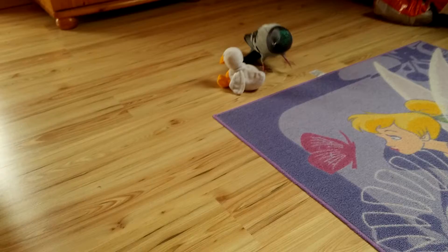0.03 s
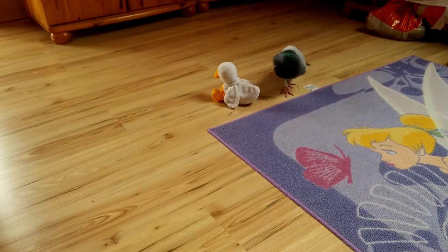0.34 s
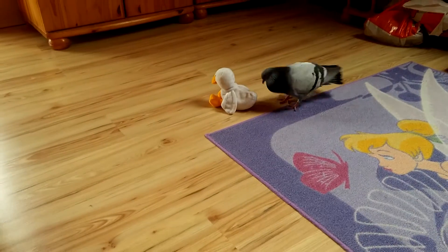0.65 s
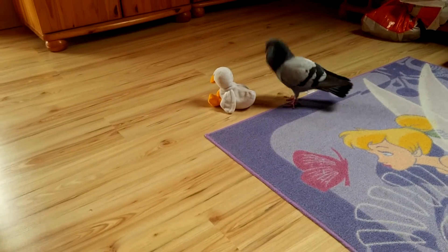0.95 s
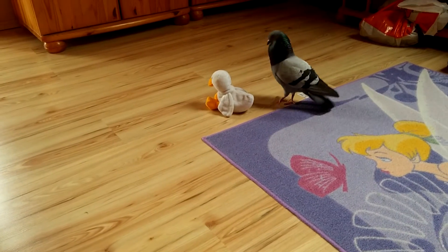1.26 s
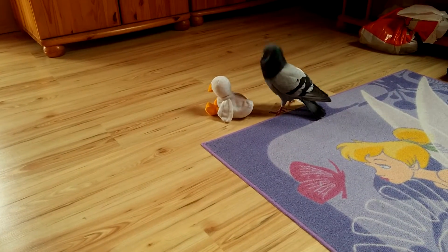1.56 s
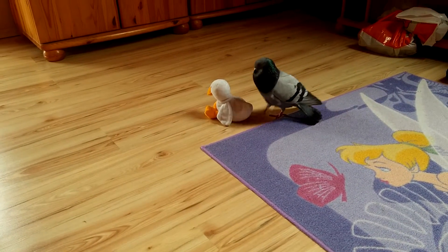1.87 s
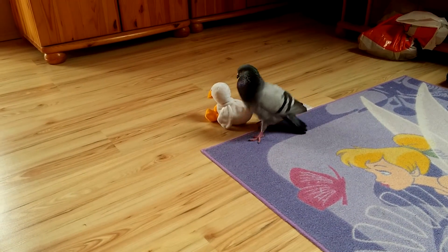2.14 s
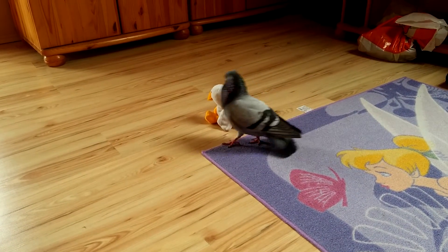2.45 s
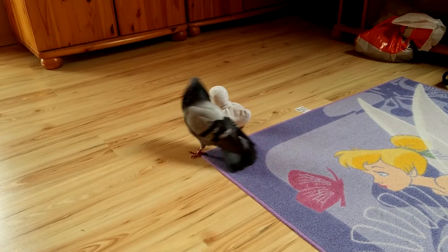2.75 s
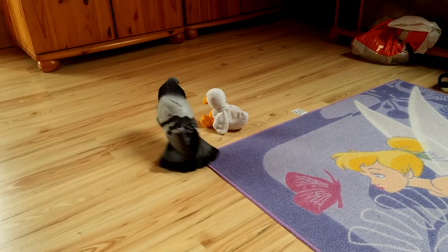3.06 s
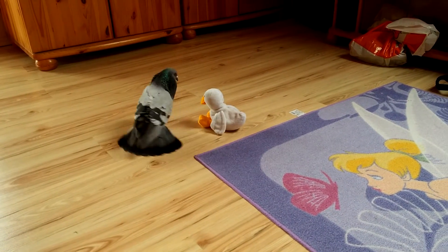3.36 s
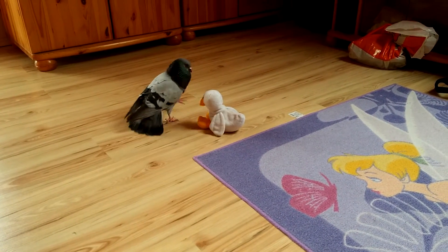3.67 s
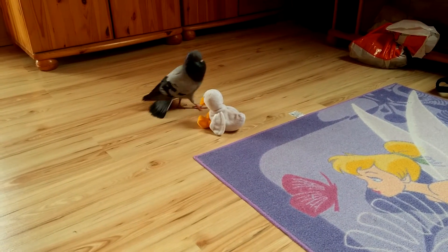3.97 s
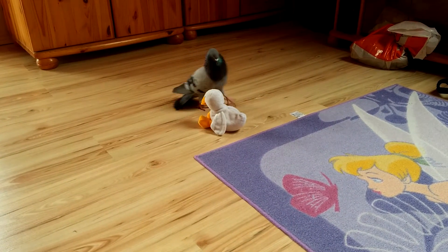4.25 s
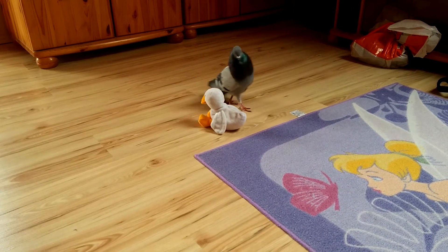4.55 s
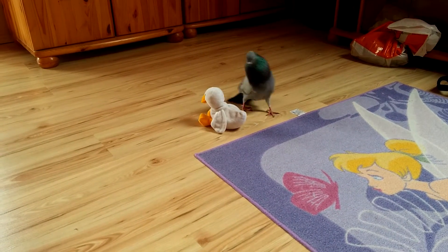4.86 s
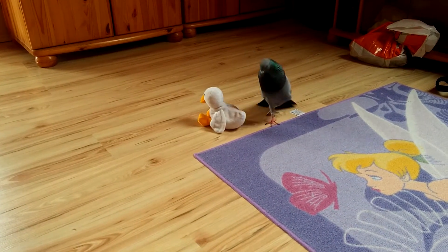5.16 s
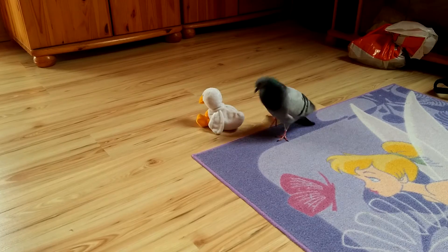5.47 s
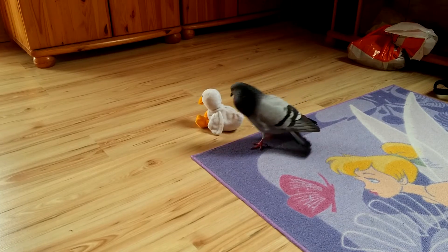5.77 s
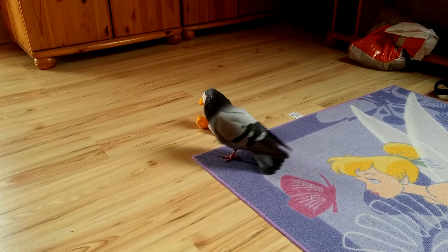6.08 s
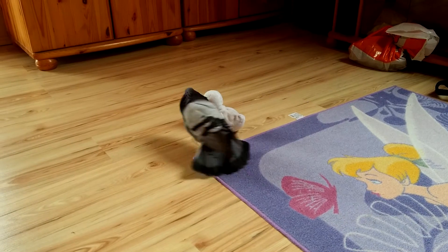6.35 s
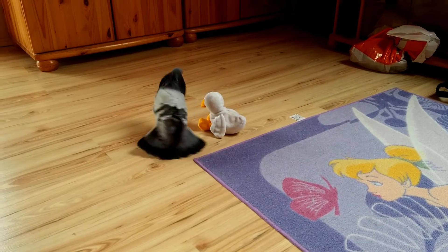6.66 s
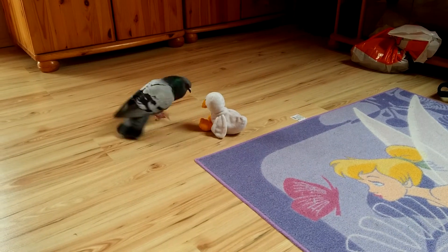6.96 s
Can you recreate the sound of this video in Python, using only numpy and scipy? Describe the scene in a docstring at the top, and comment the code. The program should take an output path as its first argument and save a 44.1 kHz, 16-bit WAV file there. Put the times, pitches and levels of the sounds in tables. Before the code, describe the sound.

A pigeon gives a short, throaty rolling coo, then walks on a wooden floor with light claw ticks and scuffs.

```python
"""A pigeon struts and coos

A pigeon walks round a soft toy on a wooden floor in a small, quiet room. It gives a throaty
coo: a nearly pure tone, chopped by a flutter so that it rolls. Its claws tick, scuff and knock
the boards, and its fanned tail hisses over rug and floor. Then it starts to coo again."""
import sys
import numpy as np
from scipy import signal
from scipy.fft import rfft, irfft
from scipy.io import wavfile
from scipy.ndimage import uniform_filter1d

SR = 44100
rng = np.random.default_rng(int(sys.argv[2]) if len(sys.argv) > 2 else 0)


def pcm_store(signal):
    """Save signal as 16-bit PCM."""
    levels = np.round(np.clip(np.atleast_2d(signal), -1, 1) * 32767)
    wavfile.write(sys.argv[1], SR, levels.astype(np.int16).T)


N = 318402
T = np.arange(N) / SR

# tone of the room air, the feathers, a claw's tick, a claw's scrape and the throat:
# (frequency [Hz], gain [dB])
AIR_TONE = [(25, -39), (55, -19), (246, -7.5), (400, -8.5), (1050, -11.5), (2230, -13.5), (4750, -16),
            (7300, -22.5), (11000, -39), (15500, -27.5)]
FEATHER_TONE = [(300, -1.5), (900, -3.5), (1800, -2), (2500, -3), (4000, -1), (5800, -3), (7600, -10.5),
                (10300, -3.5), (13000, -8), (15500, -11.5)]
TICK_TONE = [(800, -31), (1800, -28), (2400, -10.5), (3300, 1.5), (4400, 1), (5800, 1.5), (7600, -6),
             (10200, -2), (12500, -8.5), (15500, -9.5)]
SCRAPE_TONE = [(800, -24), (1800, -9.5), (2400, -12), (3300, 0), (4400, -1), (5800, -1.5), (7600, -10.5),
               (10200, -7), (12500, -12), (15500, -22)]
THROAT_TONE = [(130, -37), (180, -14), (225, -1), (450, 2), (610, -5), (700, -13.5), (860, -5.5),
               (1150, -6), (1500, -37)]
# curve that, scaled for each side, puts the bird to the right: (frequency [Hz], gain [dB])
SIDE_TILT = [(250, -0.5), (500, -2.5), (2000, -3.5), (4000, -3), (8000, -7), (10500, -7), (13000, 0)]
# the fanned tail brushing the ground: (time [s], level [dB])
TAIL_BRUSH = [(.6, -73.5), (1.3, -76.5), (1.66, -70.5), (1.85, -82), (2.0, -69.5), (2.5, -70.5),
              (2.95, -63), (3.2, -65.5), (3.76, -72.5), (4.3, -79), (4.9, -76), (5.5, -68), (5.66, -68.5),
              (5.9, -65), (6.66, -63.5), (6.86, -78)]
# small dry clicks during the coo: (time [s], level [dB], pitch [Hz])
DRY_CLICKS = [(0.738, -55.5, 877), (.773, -55.5, 700), (0.8689, -45.5, 845)]
# the ways a floorboard rings: (frequency [Hz], width [Hz], gain [dB])
BOARD_RINGS = [(282, 77, -5.5), (473, 94, 3), (595, 78, 5), (826, 170, -11), (1160, 800, -23.5)]
# feet landing: (time [s], tick level [dB], knock level [dB], wait for the next toe [s])
FOOTFALLS = [(.979, -52.5, -62, 0.0074), (1.387, -60.5, -84, 0.027), (2.019, -55.5, -75, 0.0242),
             (2.528, -58, -65.5, 0.03), (2.7995, -50.5, -63.5, .008), (3.047, -51, -63, 0.0266),
             (3.342, -48.5, -66, 0.00965), (3.556, -50.5, -66.5, 0.021), (3.830, -46, -62, .009),
             (4.059, -50.5, -67, 0.018), (4.371, -49.5, -65.5, 0.00867), (4.619, -55, -67.5, 0.014),
             (4.9507, -51.5, -64, 0.022), (5.255, -57, -70.5, .012), (5.278, -68, -61.5, .012),
             (6.275, -54.5, -69.5, .012), (6.5217, -51, -66, .008), (6.6741, -56, -64.5, .03),
             (6.755, -52, -58.5, 0.00754), (6.9515, -47, -60.5, 0.00998), (7.1257, -45.5, -57, 0.013)]
# claws sliding as a foot pushes off: (time [s], level [dB])
CLAW_SLIDES = [(1.72, -61.5), (2.06, -59), (3.102, -50.5), (3.614, -49.5), (3.893, -52.5), (4.133, -50.5),
               (4.449, -49.5), (4.716, -60.5), (5.034, -48.5), (5.306, -53.5), (6.705, -50.5),
               (6.732, -54.5), (7.02, -54)]
# stutters that open the coo, each a throat pop and then a hum: (time [s], level [dB])
COO_STUTTERS = [(.604, -46.5), (.669, -37), (.811, -36)]
# a thin, clear tone between the opening notes: (time [s], pitch [Hz])
THIN_TONE = [(.604, 585), (.645, 632), (.70, 562), (.78, 586), (.915, 586)]
# short notes of the coo: (time [s], length [s], pitch [Hz], level [dB], roughness [0 = smooth])
COO_NOTES = [(.722, 0.053, 320, -59, .4), (.866, .019, 320, -54.5, 0.12), (.890, 0.015, 446.8, -37.5, 0.24),
             (0.929, 0.015, 372, -32, 0.18), (.951, 0.017, 409, -34.5, 0.25),
             (0.974, 0.0081, 363, -33, 0.25), (.992, 0.028, 314.4, -33, 0.31),
             (1.065, 0.0084, 286, -29.5, 0.4), (1.288, .02, 221, -36, 0.3),
             (6.763, 0.088, 239, -58.5, 1.23), (6.805, .13, 446, -56.5, 0.6),
             (6.89, .13, 169.4, -43.5, 0.06), (6.924, .1, 444, -63, 0.6), (7.003, .032, 225, -51, 0.28),
             (7.063, 0.025, 224, -41, 0.1), (7.088, .045, 221.6, -50.5, .4), (7.109, 0.025, 602, -40, 0.43),
             (7.175, 0.03, 232, -49, 0.1), (7.205, 0.015, 219, -36.5, 0.2)]
# the long rolling note: (time [s], pitch [Hz], level [dB], roughness [0 = smooth])
COO_ROLL = [(1.018, 300, -37.5, 0.74), (1.048, 288.7, -38, 0.94), (1.059, 291, -50, 1.1),
            (1.078, 291, -36.5, 1.06), (1.16, 297.5, -41, 0.66), (1.25, 270.9, -38, .5),
            (1.30, 236.5, -43.5, 0.63), (1.33, 244.6, -54, 0.77), (1.39, 258.5, -67.5, 0.8)]


def undb(db):
    """Turn decibels into a number to multiply by."""
    return 10 ** (np.asarray(db) / 20)


def unit(x):
    """Scale a signal to an average power of 1."""
    return x / np.sqrt(np.mean(x ** 2))


def curves(table):
    """A table's columns, joined by straight lines in time."""
    times, *columns = np.transpose(table)
    return [np.interp(T, times, column) for column in columns]


def during(table, fade_s=0.0031):
    """Fade in at a table's first time and out at its last."""
    return np.clip(np.minimum(T - table[0][0], table[-1][0] - T) / fade_s, 0, 1)


def colour(x, tone, amount=1):
    """Filter a sound by a tone table; amount scales its decibels."""
    hz, db = np.transpose(tone)
    f = np.maximum(np.fft.rfftfreq(x.shape[-1], 1 / SR), 1)
    return irfft(rfft(x) * undb(amount * np.interp(np.log(f), np.log(hz), db)), x.shape[-1])


def ring(x, hz, width_hz):
    """Keep the part of a sound near one frequency."""
    return signal.lfilter(*signal.iirpeak(hz, hz / width_hz, fs=SR), x)


def wobble(per_second):
    """A smooth random drift, about 1 in size."""
    hold = max(int(SR / per_second), 1)
    steps = np.repeat(rng.standard_normal(N // hold + 1), hold)
    return unit(uniform_filter1d(steps, hold)[:N])


def diffuse(size, alike_hz=900):
    """Noise from all sides: left and right agree only in the bass."""
    mid, side = rng.standard_normal((2, size))
    f = np.fft.rfftfreq(size, 1 / SR)
    alike = .97 / (1 + (f / alike_hz) ** 4)
    mid = irfft(rfft(mid) * np.sqrt(1 + alike), size)
    side = irfft(rfft(side) * np.sqrt(1 - alike), size)
    return np.array([mid + side, mid - side]) / np.sqrt(2)


def add(track, start_s, sound):
    """Mix a sound into a track."""
    i = int(start_s * SR)
    track[..., i:i + sound.shape[-1]] += sound[..., :max(N - i, 0)]


def room(x, left_db, echo_db, reverb_db, reverb_s, echo_s=.0072, left_lag_s=0.00019):
    """The direct sound, one near echo and a short wash of echoes, different each time."""
    t = T[:SR // 3]
    build_up = np.clip((t - .002) / 0.0066, 0, 1)
    response = diffuse(len(t)) * build_up * np.exp(-np.log(1000) * t / reverb_s)
    response *= undb(reverb_db) / np.sqrt(np.sum(response ** 2) / 2)
    # the bird is to the right, so its sound reaches the left later
    response[0, int(left_lag_s * SR)] += undb(left_db)
    response[1, 0] += 1
    for side, lag in zip(response, echo_s * rng.uniform(.9, 1.1, 2)):
        side[int(lag * SR)] += undb(echo_db)
    return signal.fftconvolve(x[None], response, axes=1)[:, :N]


def background():
    """Still air and soft hiss, with a faint rumble that differs left and right."""
    air = unit(colour(diffuse(N, alike_hz=516), AIR_TONE))
    rumble = unit(ring(rng.standard_normal((2, N)), hz=89.7, width_hz=63))
    return undb(-66.5) * air + undb(-76) * rumble


def tail(flicker_db=0.68):
    """Feather tips brush the ground with a soft, slightly uneven hiss."""
    db, = curves(TAIL_BRUSH)
    hiss = unit(colour(diffuse(N), FEATHER_TONE))
    return hiss * undb(db + 1 + flicker_db * wobble(35))


def clicks(ring_s=0.00097):
    """Tiny dull pops, each a wave or two long."""
    pops, t = np.zeros(N), T[:SR // 50]
    for start, db, hz in DRY_CLICKS:
        phase = 2 * np.pi * hz * t
        tone = np.sin(phase) + 0.3 * np.sin(1.534 * phase)
        add(pops, start, undb(db) * np.exp(-t / ring_s) * tone)
    midrange = signal.butter(4, [550, 2600], "bandpass", fs=SR, output="sos")
    return undb(13.5) * signal.sosfilt(midrange, pops)


def friction(size, uneven_db):
    """Rubbing: a dense run of tiny catches, some weak and some strong."""
    return unit(rng.standard_normal(size) * undb(uneven_db * rng.exponential(size=size)))


def bending_tick(size, spread_s=.0024):
    """A click that has run along a bending board, where highs travel faster than lows."""
    f = np.fft.rfftfreq(size, 1 / SR)
    spread = spread_s * rng.uniform(.6, 1.1)
    # the delay falls as 1 / sqrt(f) and is zero at the highest frequency
    chirp = irfft(np.exp(-1j * np.pi * spread * (2 * np.sqrt(f * SR / 2) - f)), size)
    return chirp * np.linspace(1, 0, size) ** 2


def claw_tap(t, chatter_s=0.0094):
    """A claw lands on varnish with a tick, a short ping and a brief chatter."""
    tick = undb(10) * bending_tick(len(t))
    ping = undb(-6) * ring(tick, hz=4940, width_hz=830)
    chatter = undb(-16.5) * friction(len(t), uneven_db=3) * np.exp(-t / chatter_s)
    return tick + ping + chatter


def floorboards(knocks):
    """Each push of a foot shakes the boards and makes them ring."""
    shaking = np.zeros((2, N))
    for start, push in knocks:
        thud = push * rng.standard_normal(len(push))
        add(shaking, start, room(thud, left_db=3, echo_db=-9, reverb_db=5, reverb_s=0.34))
    return sum(undb(db) * ring(shaking, hz, width) for hz, width, db in BOARD_RINGS)


def feet(next_tick_db=-6.5, knock_s=0.016, slide_s=0.028):
    """Toe after toe taps down, and sliding claws scrape. Both knock the boards."""
    ticks, scrapes = np.zeros((2, 2, N))
    t = T[:SR // 10]
    knocks = []
    for first, tick_db, knock_db, wait in FOOTFALLS:
        for start, toe_db in (first, 0), (first + wait, next_tick_db):
            tap = undb(tick_db + toe_db) * claw_tap(t)
            add(ticks, start, room(tap, left_db=-4.5, echo_db=-6.5, reverb_db=6.5, reverb_s=0.2573))
            # the two toes share the bird's weight
            knocks.append((start, undb(knock_db) * np.exp(-t / knock_s) / np.sqrt(2)))
    press = np.sin(np.linspace(0, np.pi, int(slide_s * SR)))
    for start, db in CLAW_SLIDES:
        scrape = undb(db) * press * friction(len(press), uneven_db=4)
        add(scrapes, start, room(scrape, left_db=-1, echo_db=-7, reverb_db=5.5, reverb_s=0.24))
        knocks.append((start, undb(db - 16.5) * press / 2))
    claws = undb(12) * colour(ticks, TICK_TONE) + undb(1.5) * colour(scrapes, SCRAPE_TONE)
    return claws + undb(15.5) * floorboards(knocks)


def voice_box(hz, octave_db, rough, flutter, pull=0.63):
    """A nearly pure tone that the flutter chops and bends; roughness weakens its top overtones."""
    phase = 2 * np.pi * np.cumsum(hz) / SR
    shaken = phase + pull * rough * flutter
    tone = np.sin(shaken) + undb(octave_db) * np.sin(phase + shaken)
    chopped = tone * (1 + rough * flutter) / np.sqrt(1 + rough ** 2)
    overtones = undb(octave_db - 7) * (1 - rough) * (np.sin(3 * phase) + np.sin(4 * phase) / 2)
    return np.sqrt(2) * (chopped + overtones)


def note(length, hz, db, rough, flutter, rise_share=0.19, sag_share=.03, crop_hz=456, crop_width_hz=52):
    """One short note: it starts fast, sags in pitch and fades over its second half."""
    age = np.linspace(0, 1, int(length * SR))
    opening = np.clip(np.minimum(age / rise_share, 2 * (1 - age)), 0, 1)
    # the swollen crop, a pouch in the neck, boosts the octave above low notes
    octave_db = -20 + 14 * np.exp(-((2 * hz - crop_hz) / crop_width_hz) ** 2)
    tone = voice_box(hz * (1 - sag_share * age), octave_db, rough, flutter[:len(age)])
    return undb(db) * np.sin(np.pi / 2 * opening) * tone


def stutters(pop_s=0.009, pop_hz=330, hum_after_s=0.01117, hum_s=0.033, hum_hz=317.7, rough=0.39):
    """List the opening notes: each stutter is a pop of the throat, then a softer hum."""
    pops = [(start, pop_s, pop_hz, db + 3, rough) for start, db in COO_STUTTERS]
    hums = [(start + hum_after_s, hum_s, hum_hz, db, rough) for start, db in COO_STUTTERS]
    return pops + hums


def coo(flutter_hz=98):
    """Stuttering notes run into a long falling roll, made throaty by uneven flutter and pitch."""
    beat = 2 * np.pi * np.cumsum(flutter_hz * (1 + .27 * wobble(110))) / SR
    slower_beat = .8 * np.cos(.6 * beat) * wobble(60)
    flutter = unit(np.tanh(np.cos(beat) + slower_beat + .4 * wobble(250)))
    roll_hz, roll_db, roll_rough = curves(COO_ROLL)
    roll_hz *= 1 + .065 * roll_rough ** 2 * wobble(140)
    roll = voice_box(roll_hz, octave_db=-6.5, rough=roll_rough, flutter=flutter)
    thin_hz, = curves(THIN_TONE)
    thin = voice_box(thin_hz, octave_db=-17, rough=0.13, flutter=flutter)
    voice = undb(roll_db) * roll * during(COO_ROLL) + undb(-53) * thin * during(THIN_TONE)
    for start, length, hz, db, rough in stutters() + COO_NOTES:
        add(voice, start, note(length, hz, db, rough, np.roll(flutter, -int(start * SR))))
    voice = undb(-1.65) * colour(voice, THROAT_TONE)
    return room(voice, left_db=0.5, echo_db=-15.5, reverb_db=-5.5, reverb_s=0.27)


def scene():
    """The bird, a little to the right, in the quiet room."""
    left, right = feet() + coo() + clicks() + tail()
    bird = np.array([colour(left, SIDE_TILT, amount=0.27), colour(right, SIDE_TILT, amount=-0.84)])
    return bird + background()


def record(dry):
    """The sound starts after a moment of silence; the highest treble is cut steeply."""
    start_s, fade_s, top_hz = .603, .002, 15750
    fade_in = np.clip((T - start_s) / fade_s, 0, 1)
    treble_cut = signal.ellip(10, .2, 70, top_hz, fs=SR, output="sos")
    return signal.sosfilt(treble_cut, dry * fade_in)


dry = scene()
out = record(dry)
pcm_store(out)
```